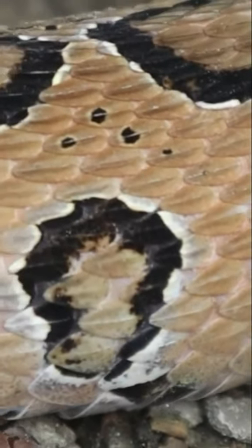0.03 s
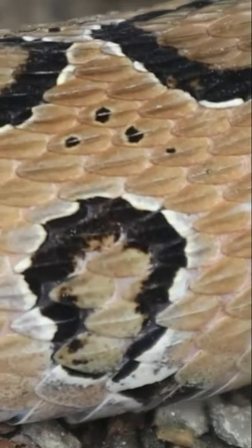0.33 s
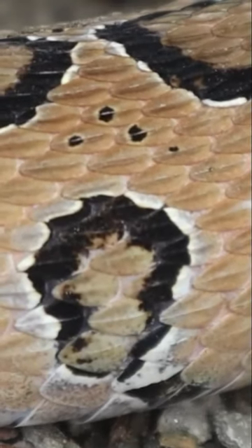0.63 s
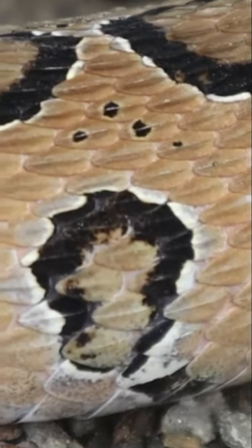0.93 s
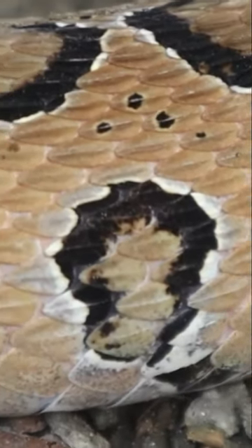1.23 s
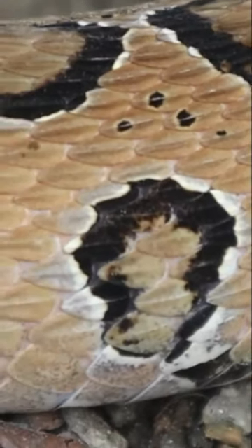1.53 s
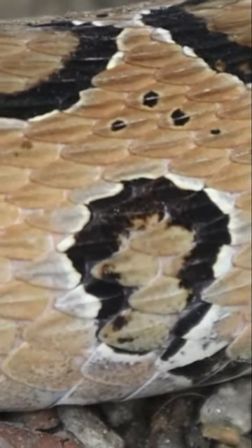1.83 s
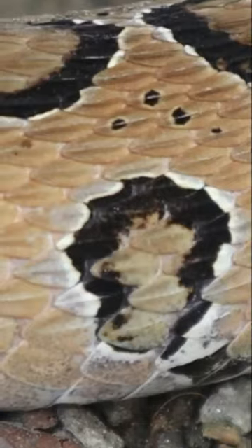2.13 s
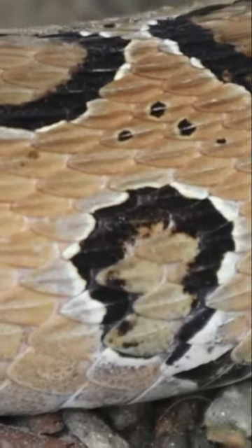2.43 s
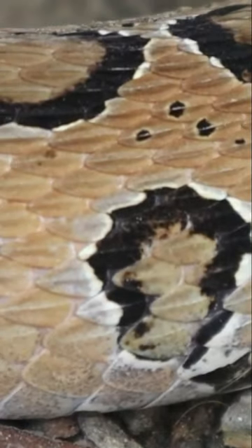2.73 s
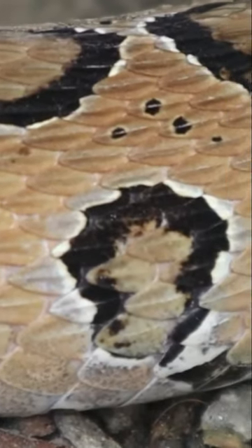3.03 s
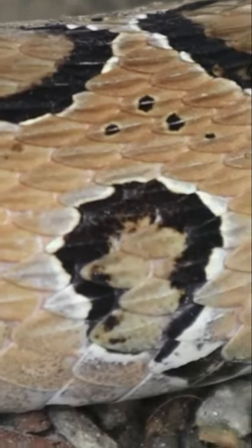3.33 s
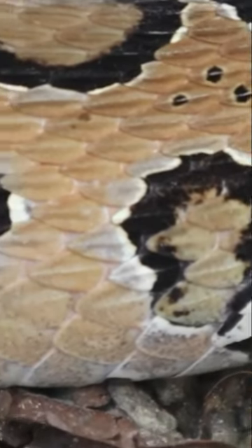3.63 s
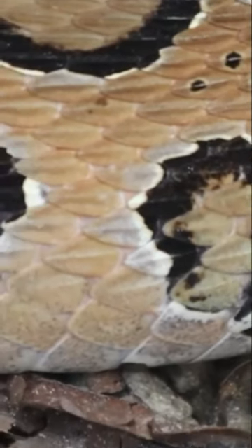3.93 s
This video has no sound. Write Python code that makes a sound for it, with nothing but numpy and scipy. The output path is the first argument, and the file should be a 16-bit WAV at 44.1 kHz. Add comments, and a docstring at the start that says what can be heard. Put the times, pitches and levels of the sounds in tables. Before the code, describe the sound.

Close snake hiss: a brief thin intake, then a long, forceful hiss dying away.

```python
"""A thin hiss, close by, as a large snake on gravel draws air in. It stops for an instant, then forces
the air out in one long sharp hiss that swells and slowly runs down. Both hisses are the broadband noise
of turbulent flow, coloured by the resonances of a narrow airway. Under them lie three soft bumps and
a low wavering drone, perhaps a far engine."""
import sys
import numpy as np
from scipy import signal
from scipy.fft import rfft, irfft
from scipy.io import wavfile

SR = 44100
rng = np.random.default_rng(int(sys.argv[2]) if len(sys.argv) > 2 else 0)


def persist_wave(psi):
    """Save psi, clipped to +-1, as 16-bit WAV."""
    counts = np.round(np.clip(psi, -1, 1) * 32767).astype(np.int16)
    wavfile.write(sys.argv[1], SR, np.atleast_2d(counts).T)


N = 176400
T = np.arange(N) / SR
FRAME, HOP = 1024, 256  # samples
HZ = np.fft.rfftfreq(FRAME, 1 / SR)
TIMES = np.arange(N // HOP + 5)[:, None] * HOP / SR

# push of the outward breath (time [s], relative level [dB])
OUT_PUSH = [(.465, -51), (.49, -20.5), (.54, -12.5), (.63, -7.5), (.71, -5.5), (.77, -1.5), (1.15, 1),
            (1.4, -0.5), (1.55, -3), (1.72, -1), (1.95, -1.5), (2.38, -6.5), (2.48, -9), (2.7, -11),
            (2.85, -12), (3.4, -17.5), (3.7, -22), (4, -24.5)]
# boost of three bands of the outward hiss (time [s], treble [dB], whistle [dB], hollow [dB])
BAND_BOOSTS = [(.5, -1.5, -9, 7.5), (.8, 1.5, 1, 2), (1.2, 1.5, -3, -0.5), (1.55, 3.5, 2, 1.5),
               (1.8, 0.5, 6, 0.5), (2.2, 2, 0, -0.5), (2.65, 3, 6.5, 2), (3, 3.5, -1.5, 2),
               (3.4, 5, -6.5, 2), (4, 3.5, -4.5, 3)]
# airway response, blowing out (frequency [Hz], relative spectral level [dB])
OUT_SPECTRUM = [(60, -45), (250, -33), (400, -18), (480, -18), (600, -25.5), (1020, -23.5), (1220, -34),
                (1660, -25), (1810, -39), (1920, -25), (2300, -19.5), (2490, -24.5), (2720, -12.5),
                (2850, -30), (2970, -12.5), (3220, -17.5), (3360, -25), (3500, -19.5), (3660, -25),
                (3810, -15.5), (4000, -18.5), (4310, -17), (4490, -34), (4660, -19), (4790, -22.5),
                (4920, -16.5), (5450, -16.5), (5700, -19), (5970, -14), (6130, -17), (6550, -9.5),
                (7350, -11.5), (7560, -25), (7720, -19), (8280, -13.5), (8850, -18), (9200, -7.5),
                (9700, -5), (10050, -10), (10560, 2), (10760, -10), (10930, -2), (11120, -9), (11400, -3),
                (11850, -14.5), (12350, -10.5), (13500, -27), (14400, -24)]
# resonances that stand out or sink as the push ebbs (centre [Hz], width [Hz], gain [dB per dB lost])
EBB_RESONANCES = [(1580, 440, .15), (2760, 66, -0.2), (3140, 330, -0.1424), (3930, 290, -.2),
                  (10990, 272, 0.4449)]
# pipe-like airway resonance, rising as the air runs out (time [s], centre [Hz], gain [dB])
PIPE_RESONANCE = [(1, 1411, 1), (1.8, 1576, 2), (3.4, 1660, 3)]
# stereo balance of the outward hiss (frequency [Hz], left over right [dB])
OUT_LEAN = [(300, 0), (600, 3), (900, 0), (2700, -1), (3020, 4), (3400, 0), (5800, 1), (6100, 5), (6600, 1),
            (7220, -5), (7800, 4), (8500, -3), (9000, -2), (9600, 6), (10050, -1), (10600, 3), (10800, -4),
            (11550, 8), (11900, -3), (12600, 0)]
# likeness of its two channels (frequency [Hz], coherence [0-1])
OUT_COHERENCE = [(200, .75), (450, .86), (1000, .72), (1250, .35), (1600, .92), (2200, .35), (3200, .28),
                 (3580, .9), (3900, .35), (4600, .35), (4780, .7), (5000, .35), (5700, .35), (6600, .75),
                 (7400, .65), (7800, .15), (8500, .5), (9300, .92), (11200, .93), (11750, .35),
                 (12200, .86), (12900, .55), (13250, 1)]
# phase between its two channels (frequency [Hz], left lead [rad])
OUT_LEAD = [(450, .1), (750, -.5), (1150, .8), (1500, 0), (2000, .1), (2300, 2.5), (3100, 2.8), (3500, 0),
            (4000, 1.5), (4400, 2.8), (4600, .8), (4780, 0), (5100, 2.3), (5600, .5), (6300, -.2),
            (7000, .7), (7300, 3), (7600, 3), (8350, -.3), (8900, 2.7), (9500, 2.4), (9850, 1.4),
            (10400, 2.4), (10650, 1.9), (10900, 2.9), (11400, 2.6), (11900, 2.1), (12900, 2.1),
            (13250, 3.14)]
# airway response, drawing in (frequency [Hz], relative spectral level [dB])
IN_SPECTRUM = [(60, -30), (250, -14), (430, -6), (650, -14), (1000, -16), (1230, -27), (1600, -15.5),
               (1850, -23), (2400, -15), (2830, -24), (3050, -16), (5500, -16.5), (5950, -6), (6700, -12),
               (7270, 0), (7700, -10), (8300, -10), (8750, -19), (9500, -15), (10100, -28), (11100, -7),
               (11800, -19), (12300, -15), (13000, -24), (13350, -55)]
# stereo image of the intake (frequency [Hz], left over right [dB], coherence [0-1], left lead [rad])
IN_STEREO = [(300, 0, .9, 0), (1600, 0, .75, 0), (2500, -1, .25, 2.6), (5200, 3, .4, 1.7),
             (5950, 8, .65, -.2), (6800, -3, .75, .2), (7250, -9, .9, -3), (8300, -2, .7, -6),
             (8800, 1, .7, -3.8), (9600, 4, .5, -4), (11100, -5, .7, -3.6), (12800, 0, .95, -3.14)]
# soft bumps, perhaps of the body shifting (time [s], level [dB])
BUMP_EVENTS = [(.091, -37.5), (.376, -41.5), (1.18, -40)]
# colour of a bump (frequency [Hz], relative spectral level [dB])
BUMP_SPECTRUM = [(40, -23), (130, -6), (210, 10.5), (320, -5), (450, 3), (900, -17), (1500, -40),
                 (6000, -60)]
# tone of the drone (time [s], pitch [Hz], level [dB])
DRONE_TONE = [(0, 79, -36.5), (.22, 81, -40), (.38, 83.1, -26), (.5, 79.7, -35), (.75, 74.1, -37.5),
              (.98, 82.1, -71), (1.08, 80, -30.5), (1.16, 77.3, -27), (1.28, 72.1, -35.5), (1.45, 60, -39),
              (1.78, 76, -49), (1.88, 75.4, -39.5), (2.01, 74.3, -44), (2.08, 77.1, -61), (2.58, 82.4, -67),
              (2.72, 82.3, -41.5), (2.88, 81.6, -54), (3, 82.4, -45), (3.17, 82.4, -44.5),
              (3.24, 83.1, -62), (3.31, 83, -50), (3.44, 82, -62), (3.49, 80.6, -44), (3.6, 81, -48),
              (3.72, 84, -60), (3.79, 83, -46.5), (4, 82, -76)]
# rumble around the drone (time [s], level [dB])
RUMBLE_LEVEL = [(0, -37), (.6, -35.5), (1.2, -38.5), (1.9, -41.5), (2.15, -47), (2.35, -44), (2.55, -50.5),
                (2.88, -47.5), (3.25, -57), (3.55, -58), (4, -62)]
# colour of the rumble (frequency [Hz], relative spectral level [dB])
RUMBLE_SPECTRUM = [(15, -34), (32, -18), (58, -16), (85, 7.5), (115, -7), (145, -6), (210, -16),
                   (300, -19.5), (700, -29), (3000, -36), (12000, -101)]

OUT_DB, IN_DB = -16.5, -30
TREBLE_HZ, TREBLE_EDGE_HZ = 9000, 500
WHISTLE_HZ, WHISTLE_WIDTH_HZ = 10620, 150
HOLLOW_HZ, HOLLOW_WIDTH_HZ = 453, 1230
PATCH_DB, PATCH_HZ, PATCH_S = 1.05, 350, .007  # turbulent patches in the hiss
FLUTTER_DB, FLUTTER_HZ = .45, 140  # turbulent flutter of the whole jet


def hiss_out():
    """Source and filter: a turbulent jet excites airway resonances, sharpening toward a whistle."""
    push_db, = over_time(OUT_PUSH, TIMES)
    treble_db, whistle_db, hollow_db = over_time(BAND_BOOSTS, TIMES)
    pipe_hz, pipe_db = over_time(PIPE_RESONANCE, TIMES)
    ebb_slope = sum(slope * bell(hz, width_hz) for hz, width_hz, slope in EBB_RESONANCES)
    change_db = (treble_db * .5 * (1 + np.tanh((HZ - TREBLE_HZ) / TREBLE_EDGE_HZ))
                 + whistle_db * bell(WHISTLE_HZ, WHISTLE_WIDTH_HZ)
                 - push_db * ebb_slope
                 + pipe_db * bell(pipe_hz, width_hz=160)
                 + hollow_db * bell(HOLLOW_HZ, HOLLOW_WIDTH_HZ)
                 + PATCH_DB * patches(PATCH_HZ, PATCH_S)
                 + upper_mid_flicker(push_db))
    stereo = over_frequency(OUT_LEAN) + over_frequency(OUT_COHERENCE) + over_frequency(OUT_LEAD)
    jet = coloured_noise(OUT_SPECTRUM, change_db, *stereo)
    level_db = OUT_DB + over_time(OUT_PUSH, T)[0] + FLUTTER_DB * wander(FLUTTER_HZ)
    return amp(level_db) * jet


def upper_mid_flicker(level_db):
    """Random amplitude modulation in dB: a swirly flicker near 3.7 kHz, deeper when it is quieter."""
    depth_db = 8 * bell(3700, width_hz=1100) * amp(-.26 * level_db)
    flicker = patches(width_hz=82, length_s=.032)
    return depth_db * 2 * (1 - np.exp(-.5 * flicker))  # dips are deeper than peaks


def hiss_in():
    """Steady turbulent inflow, filtered by the airway, decays exponentially when it is shut off."""
    stop_s, release_db_per_s = .427, 1351.5
    release_db = release_db_per_s * np.clip(T - stop_s, 0, .1)
    level_db = IN_DB - release_db + FLUTTER_DB * wander(FLUTTER_HZ)
    turbulence_db = PATCH_DB * patches(PATCH_HZ, PATCH_S)
    return amp(level_db) * coloured_noise(IN_SPECTRUM, turbulence_db, *over_frequency(IN_STEREO))


def bumps():
    """Transients: dull noise under Gaussian envelopes that rise quickly and fall more slowly."""
    rise_s, fall_s = .0087, .027
    envelope = np.zeros(N)
    for peak_s, level_db in BUMP_EVENTS:
        width_s = np.where(T < peak_s, rise_s, fall_s)
        envelope += amp(level_db) * np.exp(-.5 * ((T - peak_s) / width_s) ** 2)
    return envelope * coloured_noise(BUMP_SPECTRUM, coherence=.97)


def drone():
    """Random frequency modulation makes a low tone waver in a dull rumble, alike in both channels."""
    pitch_hz, level_db = over_time(DRONE_TONE, T)
    wavering_hz = pitch_hz * (1 + .032 * wander(rate_hz=9.4))
    tone = unit_rms(np.sin(2 * np.pi * np.cumsum(wavering_hz) / SR))
    rumble = amp(over_time(RUMBLE_LEVEL, T)[0]) * coloured_noise(RUMBLE_SPECTRUM)
    return amp(level_db) * tone + rumble


def coloured_noise(spectrum, change_db=0, balance_db=0, coherence=1, lead_rad=0):
    """Spectral shaping of partly coherent stereo noise; rms 1 when change_db is 0."""
    a, b, c, d = rng.standard_normal((4, len(TIMES), len(HZ)))
    left, independent = a + 1j * b, c + 1j * d
    coherence = np.clip(coherence, 0, 1)
    right = (coherence * left + np.sqrt(1 - coherence ** 2) * independent) * np.exp(-1j * lead_rad)
    lean = amp(balance_db)
    panned = np.array([left * lean, right]) * np.sqrt(2 / (1 + lean ** 2))  # constant power
    coloured = panned * amp(over_frequency(spectrum)[0])
    frames = np.array([coloured, coloured * amp(change_db)]).swapaxes(-1, -2)
    plain, shaped = signal.istft(frames, nperseg=FRAME, noverlap=FRAME - HOP)[1][..., :N]
    return shaped / np.sqrt(np.mean(plain ** 2))


def patches(width_hz, length_s):
    """A random field of rms 1, exponentially correlated over frequency and time."""
    white = rng.standard_normal((len(TIMES), len(HZ)))
    lingering = signal.lfilter([1], [1, -np.exp(-HOP / SR / length_s)], white, axis=0)
    return unit_rms(signal.lfilter([1], [1, -np.exp(-HZ[1] / width_hz)], lingering, axis=1))


def wander(rate_hz):
    """Band-pass noise of rms 1, mostly in the three octaves below the given rate."""
    ratio = np.fft.rfftfreq(N, 1 / SR) / rate_hz
    band = ratio / (ratio + .15) / (1 + ratio ** 2)
    return unit_rms(irfft(rfft(rng.standard_normal(N)) * band, N))


def bell(hz, width_hz):
    """A Gaussian peak over frequency, height 1."""
    return np.exp(-.5 * ((HZ - hz) / width_hz) ** 2)


def over_time(table, t):
    """Linear interpolation of a table's columns at times t."""
    times, *columns = np.transpose(table)
    return [np.interp(t, times, column) for column in columns]


def over_frequency(table):
    """Interpolation of a table's columns at every bin, along log frequency."""
    hz, *columns = np.transpose(table)
    return [np.interp(np.log(HZ + 1), np.log(hz), column) for column in columns]


def amp(db):
    """Decibels to amplitude ratio."""
    return 10 ** (np.asarray(db) / 20)


def unit_rms(x):
    """Normalisation to rms 1."""
    return x / np.sqrt(np.mean(x ** 2) + 1e-20)


def scene():
    """Superposition of the snake's two breaths, the bumps and the drone."""
    return hiss_in() + hiss_out() + bumps() + drone()


def record(dry):
    """Band limiting: the microphone's low cut, then a steep treble cut."""
    low_cut_hz, high_cut_hz = 42.3, 14450
    high_pass = signal.butter(4, low_cut_hz, btype="high", fs=SR, output="sos")
    low_pass = signal.firwin(511, high_cut_hz, window=("kaiser", 9), fs=SR)
    return signal.oaconvolve(signal.sosfilt(high_pass, dry), low_pass[None], "same")


dry = scene()
out = record(dry)
persist_wave(out)
```